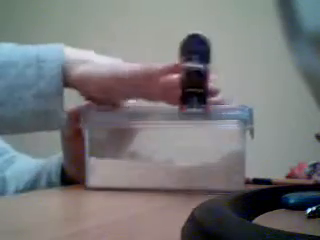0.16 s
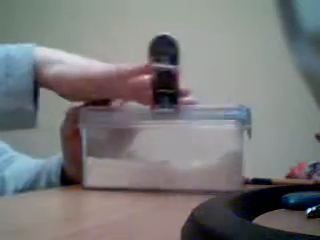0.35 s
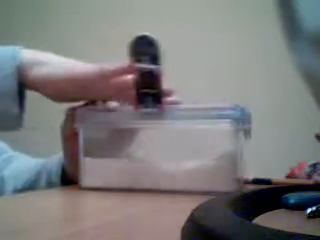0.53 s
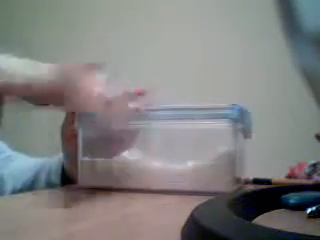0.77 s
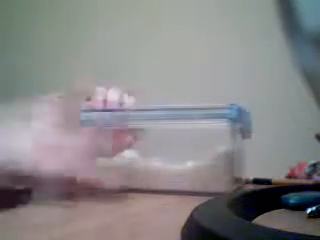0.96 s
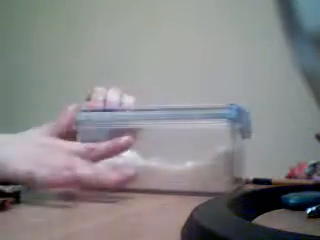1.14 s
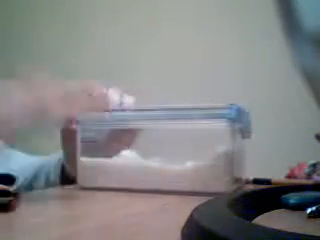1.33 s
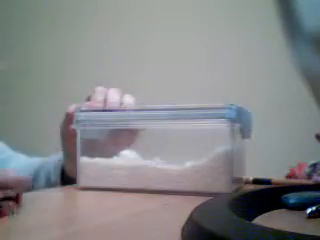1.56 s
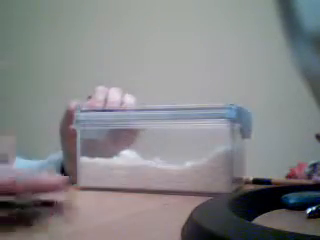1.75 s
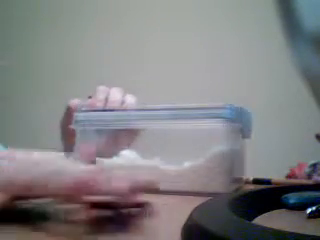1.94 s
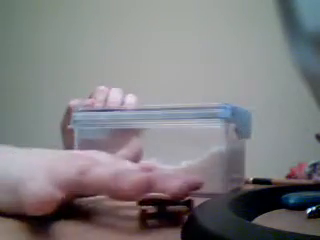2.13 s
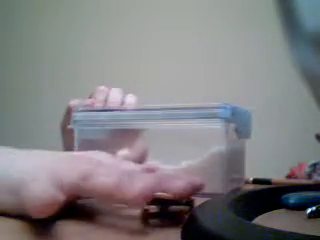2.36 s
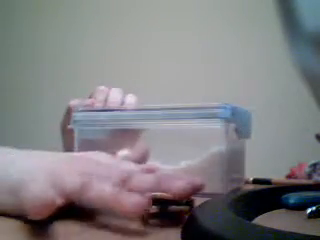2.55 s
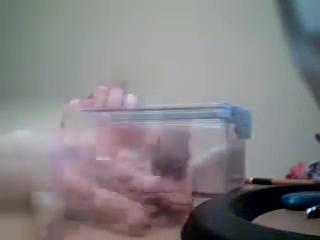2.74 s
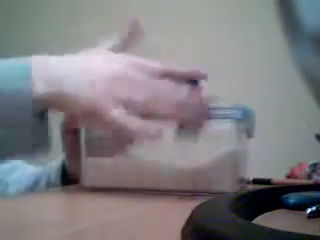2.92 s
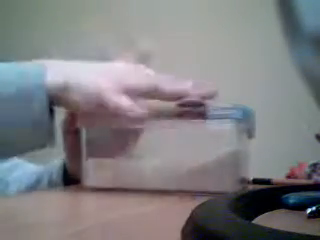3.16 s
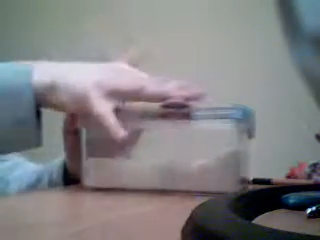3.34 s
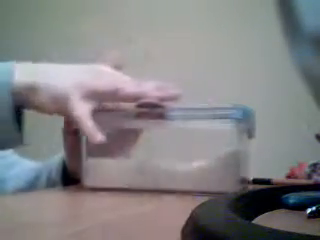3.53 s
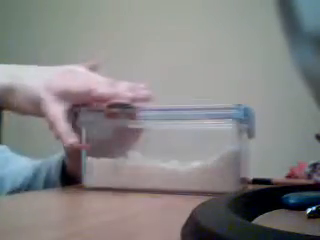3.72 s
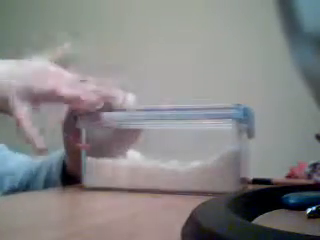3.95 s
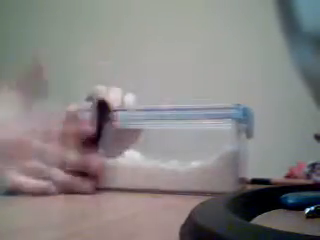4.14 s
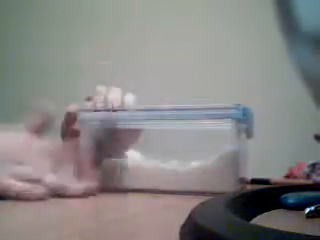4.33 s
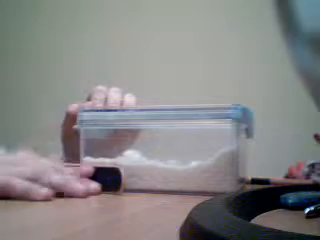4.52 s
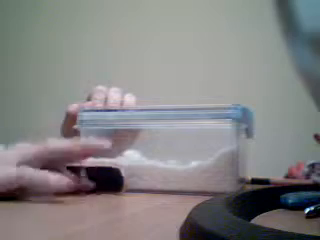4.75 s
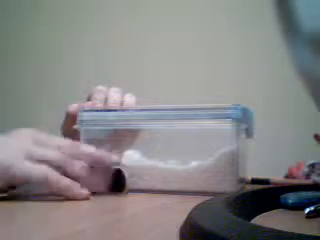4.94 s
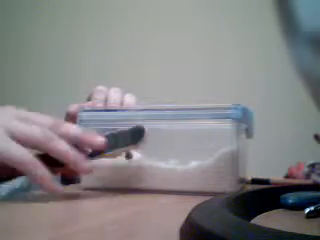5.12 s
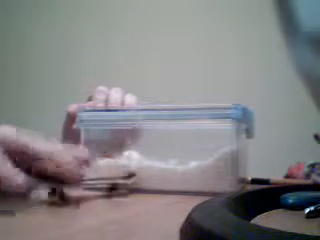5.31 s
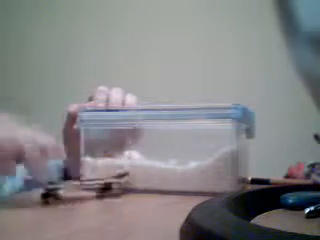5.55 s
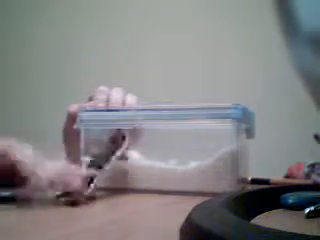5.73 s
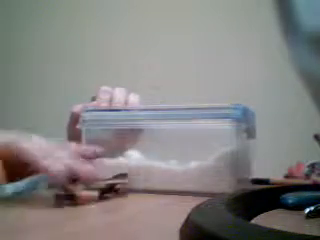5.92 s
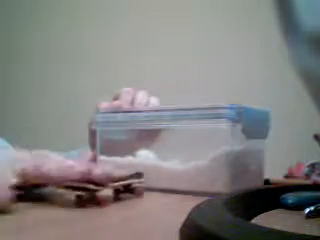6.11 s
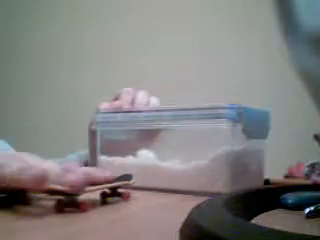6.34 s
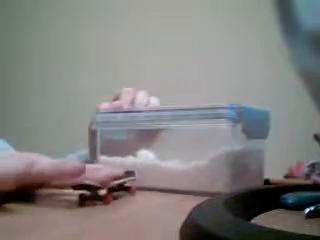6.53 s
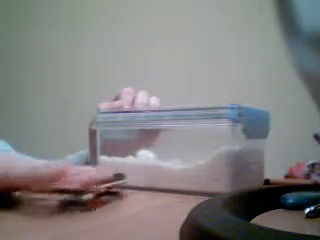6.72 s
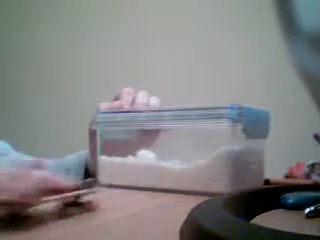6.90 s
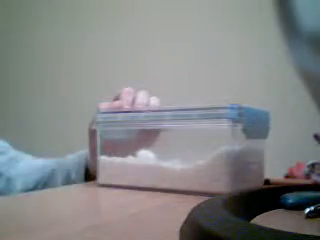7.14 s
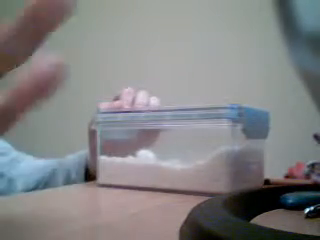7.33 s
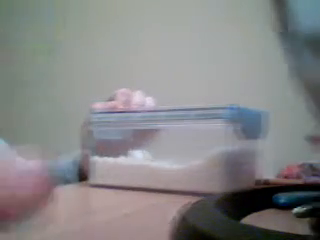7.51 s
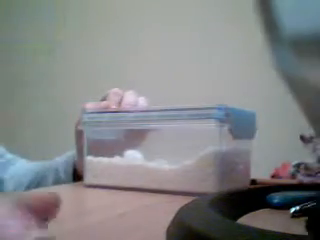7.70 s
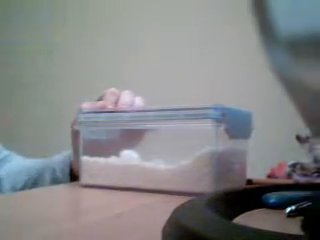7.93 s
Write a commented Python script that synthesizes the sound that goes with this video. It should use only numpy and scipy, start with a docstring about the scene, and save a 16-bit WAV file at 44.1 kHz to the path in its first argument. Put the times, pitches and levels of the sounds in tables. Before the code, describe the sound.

Steady dull hiss from a cheap close microphone lies under everything, in a small room with a short ring. After near silence, a tiny toy skateboard flicks with a quick clack at 0.8 s and lands harder at 1.0 s. A softer tap at 1.5 s starts a gritty low wheel roll fading by 2.2 s. At 2.75-3.0 s a tight clatter strikes the plastic box lid. After a pause, the densest hard clatters hit at 4.05-4.15 s with a low thump, followed by knocks and a brief scrape around 4.3-4.6 s. Lighter taps cluster at 5.15-5.3 s and 5.6-5.95 s, with faint short rolls continuing and swelling until about 7.0 s, where a knock lands. The loudest, driest smack comes at 7.23 s, then close bright knocks near 7.5 s, a faint roll and small tap at 7.7 s, and hiss.

```python
"""A finger-sized skateboard is played on a wooden table and a plastic box lid, close to a cheap camera mic.
A flick and a landing come first, a long roll leaves the tap at 1.5 s, and hard clatters peak near 4.1 s.
Lighter taps and short rolls follow, then the hardest smack at 7.2 s and a few knocks closer to the mic.
Contacts are bursts of taps that ring deck, table and axles; some contacts thump the tabletop and
rolling wheels drum the same modes with dense grit. A small room rings on over steady hiss."""
import sys
import numpy as np
from scipy import signal
from scipy.fft import rfft, irfft
from scipy.io import wavfile
from scipy.ndimage import uniform_filter1d

SR = 44100
rng = np.random.default_rng(int(sys.argv[2]) if len(sys.argv) > 2 else 0)


def master_out(mix):
    """Clip the mix to full scale and print it as 16-bit PCM to the path in sys.argv[1]."""
    frames = np.transpose(np.atleast_2d(mix))
    ceiling = np.clip(frames, -1, 1)
    pcm = np.round(ceiling * 32767).astype(np.int16)
    wavfile.write(sys.argv[1], SR, pcm)


N = 355887

# Levels in the event tables are set before the room and the filters.
# Contacts of board and table. Each row: start in seconds, knock peak in dB, axle tick level in dB
# (strongest short-term rms), knock centre in Hz.
CONTACTS = [(0.756, -35, -56, 1100), (0.775, -14.5, -27.5, 926.6), (0.818, -15, -22, 800),
            (0.825, -16, -18.5, 700), (0.902, -34, -35, 1250), (0.913, -38, -34.5, 800),
            (0.944, -38, -40, 1800), (0.965, -18.5, -25, 785), (0.983, -5.5, -15.5, 1100),
            (1.502, -31, -37.5, 500), (1.516, -21, -41, 1190), (2.74, -22.5, -29, 764),
            (2.822, -26, -29.5, 650), (2.828, -14, -31, 1134), (2.86, -10.5, -30, 1310),
            (2.875, -16, -22.5, 1070), (2.977, -16.5, -35, 1000), (3.861, -46, -45.5, 970),
            (4.045, -24.5, -29, 1420), (4.053, -8, -22.5, 1250), (4.063, -8, -37, 1270),
            (4.089, -15, -34.5, 700), (4.105, -5, -19.5, 1120), (4.112, -9.5, -37, 1120),
            (4.13, -8.5, -26, 1070), (4.3, -26, -38.5, 740), (4.337, -14, -25, 960),
            (4.375, -11, -23, 1380), (4.38, -18.5, -23, 760), (4.581, -22.5, -42, 780),
            (4.838, -38.5, -63, 1200), (5.036, -25, -41, 757), (5.145, -26, -52, 815),
            (5.162, -31, -43, 720), (5.183, -15.5, -39, 1160), (5.216, -14.5, -32, 700),
            (5.229, -16.5, -33, 1150), (5.277, -36, -46, 1210), (5.6, -13, -35.5, 765),
            (5.615, -31.5, -52, 765), (5.653, -30.5, -42.5, 1010), (5.679, -31, -39.5, 1210),
            (5.699, -32.5, -49, 1220), (5.738, -15, -36, 1170), (5.782, -23.5, -44, 1180),
            (5.81, -29.5, -51, 759), (5.861, -25.5, -31.5, 1210), (5.901, -29.5, -41, 1200),
            (5.942, -23.5, -43, 1120), (6.962, -17.5, -24.5, 1024), (7.063, -42, -45.5, 579),
            (7.233, -2, -16.5, 900), (7.264, -15, -26, 1170), (7.28, -18.5, -49.5, 657),
            (7.366, -33, -46.5, 1100), (7.432, -42.5, -45, 977), (7.512, -12.5, -36.5, 1800),
            (7.526, -13, -52, 900), (7.56, -38.5, -53, 1700), (7.708, -23, -49.5, 1870)]
# Pushes of the rolling board. Each row: start in seconds, fastest moment in seconds, stop in seconds
# (a stop ahead of the fastest moment cuts the push off), level of the low drumming at full speed in dB,
# axle scrape relative to it in dB.
PUSHES = [(1.49, 1.803, 2.24, -42.5, -11.5), (2.705, 2.737, 2.73, -34.5, -18),
          (4.04, 4.077, 4.09, -33, -13), (4.329, 4.368, 4.385, -27.5, -9.5), (3.859, 3.865, 3.97, -48, -12),
          (4.82, 4.882, 5.1, -61, -24), (4.93, 4.976, 5, -60, 2), (5.55, 5.616, 6.03, -53.5, -8),
          (5.87, 5.958, 6.11, -42, -19.5), (6.076, 6.145, 6.16, -42, -17.5),
          (6.196, 6.262, 6.33, -54.5, -13), (6.361, 6.49, 6.59, -43, -15.5),
          (6.607, 6.833, 6.99, -37.5, -19), (7.549, 7.721, 7.85, -52.5, -13)]
# Low thumps of tabletop and box under some contacts. Each row: start in seconds, peak in dB, centre in Hz.
THUMPS = [(0.776, -36, 84), (0.822, -29.5, 161), (0.972, -27, 178), (1.502, -34, 281), (2.856, -31.5, 163),
          (4.062, -19.5, 318), (4.11, -23.5, 346), (5.217, -29.5, 370), (5.853, -35.5, 220),
          (6.952, -32.5, 147), (7.267, -25, 335), (7.371, -45, 52.34), (7.429, -43.5, 56.5),
          (7.528, -27, 350), (7.701, -38, 112)]
# Ringing modes of deck and table. Each row: pitch in Hz, relative level in dB.
DECK_MODES = [(300, -14.5), (490, -8), (590, -7), (725, -1.5), (940, -4), (1080, -1), (1220, -1),
              (1380, -6), (1550, -10.5), (1850, -7.5), (2060, -2.5)]
# Ringing modes of axles and wheels. Each row: pitch in Hz, relative level in dB.
AXLE_MODES = [(2520, -3.5), (3000, -3.5), (3750, -2), (4200, 0.5), (4600, 6), (5050, 2.5), (5700, -3.5),
              (6350, -18.5), (7000, -6.5), (7700, -44)]
# Low modes of tabletop and box. Each row: pitch in Hz, relative level in dB.
TABLETOP_MODES = [(60, 6.5), (78, 0.5), (120, -3), (155, -1), (200, -7.5), (295, -4.5), (340, 1)]
# Colour of the room tail. Each row: frequency in Hz, level in dB.
ROOM_COLOUR = [(300, -2), (700, -15), (1100, -8), (2000, -13), (3200, -14.5), (4600, -10), (5700, -12.5),
               (7000, -5.5)]
# Spectrum of the hiss. Each row: frequency in Hz, relative density in dB per Hz.
HISS_COLOUR = [(24, -28.5), (40, 0), (119, -4.5), (186, -6), (339, -7.5), (371, -7), (846, -9), (2460, -17),
               (7020, -17), (8200, -26.5), (10700, -58.5), (18000, -120)]
# Share of the board's sound sent round by the walls, falling as it is played closer to the microphone.
# Each row: time in seconds, send level in dB.
WALL_SEND = [(7.0, -4.5), (7.199, -7.5), (7.5, -12.5)]

HISS_RMS_DB = -58.5  # before the final filters
ROOM_T60_S, ECHO_BUILD_S = 0.31, 0.005  # build-up is a time constant
LATE_T60_S, LATE_DB = 0.96, -15.5  # a fainter, slower part of the tail
KNOCK_CYCLES, TICK_CYCLES, THUMP_CYCLES = 20.8, 15, 24.5  # cycles until a mode has fallen 60 dB
SCATTER_DB = 1.5  # spread of mode levels from contact to contact
CHATTER_MS = 2.005  # time constant of the taps in a full-scale contact
SHORTER_DB_PER_DB = 0.15  # softer contacts chatter longer
BUMP_DB = 2.5  # rms level swing of the drumming
SPEED_POWER = 1.67  # rolling loudness grows as speed to this power
SLOW_HZ, FAST_HZ = 723, 1250  # faster wheels drum higher modes
SMALL_HZ = 223  # a board this small radiates little below here
BAND_HZ, TOP_HZ = 8150, 10800  # low-passes ahead of and after the flattening
CLIP, OFFSET = 0.72, -0.0039  # peak limit and constant offset, full scale = 1


def undb(db):
    """Turn dB into gain."""
    return 10 ** (np.asarray(db) / 20)


def unit(x):
    """Scale to rms 1."""
    return x / np.sqrt(np.mean(x ** 2))


def add(out, at, sound, db, size):
    """Mix a sound in at a sample index; db is its strongest rms over size samples (1 = peak)."""
    piece = sound[:len(out) - at]
    loudest = np.sqrt(np.max(uniform_filter1d(sound ** 2, size=size)))
    out[at:at + len(piece)] += piece * undb(db) / loudest


def grit(size, spiky_db):
    """Dense clicks of either sign whose sizes spread widely, up to a largest grain."""
    grain = np.minimum(rng.exponential(size=size), 4.5)
    return rng.standard_normal(size) * undb(spiky_db * grain)


def ring(modes, cycles, scatter_db, centre_hz=None, octaves=1., far_db=37.0, size=4096):
    """Ring decaying modes; every blow lands elsewhere, so signs and pitches shift, and gains by scatter_db."""
    hz, db = np.transpose(modes)[:, :, None]
    gain, detune, sign = rng.standard_normal((3, len(modes), 1))
    if centre_hz:
        # modes near the blow's own pitch ring most
        distance = np.log2(hz / centre_hz) / octaves
        db = db - np.minimum(6 * distance ** 2, far_db)
    turns = hz * (1 + 0.014 * detune) * np.arange(size) / SR
    tone = np.sin(2 * np.pi * turns) * np.exp(-np.log(1000) * turns / cycles)
    return np.sum(np.sign(sign) * undb(db + scatter_db * gain) * tone, axis=0)


def hiss():
    """Steady microphone and room hiss: white noise shaped in the spectrum."""
    hz, db = np.transpose(HISS_COLOUR)
    f = np.maximum(np.arange(N // 2 + 1) * SR / N, 1)
    colour = undb(np.interp(np.log(f), np.log(hz), db))
    noise = irfft(rfft(rng.standard_normal(N)) * colour, N)
    return undb(HISS_RMS_DB) * unit(noise)


def room(dry):
    """Diffuse tail: third-octave noise bands, each at its own level, building up over the first echoes."""
    hz, db = np.transpose(ROOM_COLOUR)
    t = np.arange(SR) / SR
    tail = 0
    for f in 200 * 2 ** np.arange(0, 5.5, 1 / 3):
        edges = [f * 2 ** (-1 / 6), f * 2 ** (1 / 6)]
        sos = signal.butter(2, edges, "band", fs=SR, output="sos")
        band = signal.sosfilt(sos, rng.standard_normal(len(t)))
        tail = tail + undb(np.interp(np.log(f), np.log(hz), db)) * band
    decay = undb(-60 * t / ROOM_T60_S) + undb(LATE_DB - 60 * t / LATE_T60_S)
    build_up = 1 - np.exp(-t / ECHO_BUILD_S)
    tail = tail * decay * build_up / np.sqrt(SR / 100)
    return signal.fftconvolve(dry, tail)[:N]


def thumps():
    """One soft push and release sets the low modes of tabletop and box going."""
    out = np.zeros(N)
    push = np.diff(np.hanning(128))
    for s, db, hz in THUMPS:
        modes = ring(TABLETOP_MODES, THUMP_CYCLES, 2.5, hz, 0.33, far_db=10.5, size=16384)
        add(out, int(s * SR), signal.fftconvolve(push, modes), db, size=1)
    return out


def rolling():
    """Grit under the wheels drums the knock modes and scrapes in the axles, in bumps; level follows speed."""
    def drum(drive, modes, cycles, hz, octaves):
        return unit(signal.fftconvolve(drive, ring(modes, cycles, 0, hz, octaves))[:N])

    t = np.arange(N) / SR
    smooth = uniform_filter1d(rng.standard_normal((2, N)), size=300)
    bumps = unit(uniform_filter1d(smooth, size=300))
    road = undb(BUMP_DB * bumps[0]) * grit(N, 3.2)
    low = drum(road, DECK_MODES, 24., SLOW_HZ, 0.57)
    high = drum(road, DECK_MODES, 24., FAST_HZ, 0.57)
    sand = undb(0.42 * bumps[1]) * grit(N, 4.3)
    dull = drum(sand, AXLE_MODES, 8.3, 2700., 0.55)
    bright = drum(sand, AXLE_MODES, 8.3, 4600., 0.55)
    out = np.zeros(N)
    for start, fastest, stop, db, scrape_db in PUSHES:
        speed = np.sin(np.pi / 2 * np.interp(t, [start, fastest, stop], [0, 1, 0]))
        # a harder scrape reaches the higher modes
        scrape = dull + np.clip((scrape_db + 18) / 8, 0, 1.5) * bright
        wheels = low + 0.79 * speed ** 2 * high
        out += speed ** SPEED_POWER * undb(db) * (wheels + undb(scrape_db) * scrape)
    return out


def contacts():
    """A short burst of taps with one hard tap near its start drives the knock and tick modes."""
    out = np.zeros(N)
    t_ms = np.arange(2048) * 1000 / SR
    for s, knock_db, tick_db, hz in CONTACTS:
        age = t_ms / CHATTER_MS * undb(SHORTER_DB_PER_DB * knock_db)  # in time constants
        push = grit(len(age), 3.25) * (1 - np.exp(-age / 0.24))
        push[np.searchsorted(age, 0.6)] += undb(21.5)  # the hard tap
        # wood and plastic give a little: a longer contact
        soft = uniform_filter1d(push * np.exp(-age), size=8)
        knock = signal.fftconvolve(soft, ring(DECK_MODES, KNOCK_CYCLES, SCATTER_DB, hz, 0.9))
        add(out, int(s * SR), knock, knock_db, size=1)
        sharp = push * np.exp(-age / 1.68)
        tick = signal.fftconvolve(sharp, ring(AXLE_MODES, TICK_CYCLES, SCATTER_DB))
        add(out, int(s * SR), tick, tick_db, size=256)
    return out


def scene():
    """Mix the board and its room tail with the thumps, over the hiss."""
    high_pass = signal.butter(2, SMALL_HZ, "high", fs=SR, output="sos")
    board = signal.sosfilt(high_pass, contacts() + rolling())
    send = undb(np.interp(np.arange(N) / SR, *np.transpose(WALL_SEND)))
    return (board + room(send * board) + thumps() + hiss())[None]


def record(dry):
    """The sound is low-passed, its peaks flattened and offset, then low-passed again."""
    first_cut = signal.ellip(8, .2, 46, BAND_HZ, fs=SR, output="sos")
    flat = np.clip(signal.sosfilt(first_cut, dry), -CLIP, CLIP) + OFFSET
    top_cut = signal.ellip(8, .01, 70, TOP_HZ, fs=SR, output="sos")
    return signal.sosfilt(top_cut, flat)


dry = scene()
out = record(dry)
master_out(out)
```